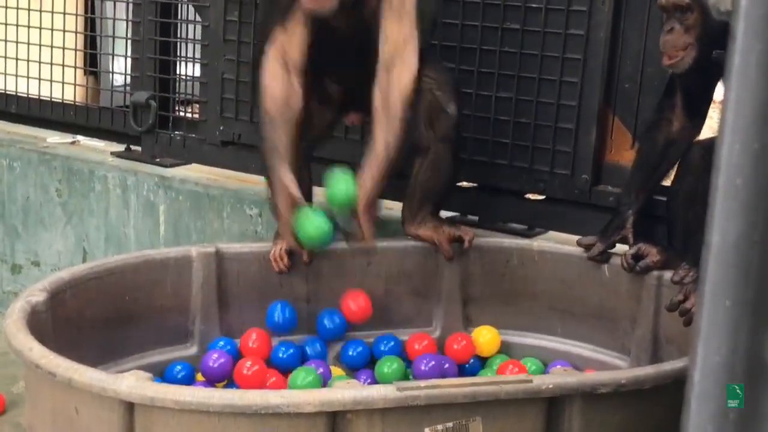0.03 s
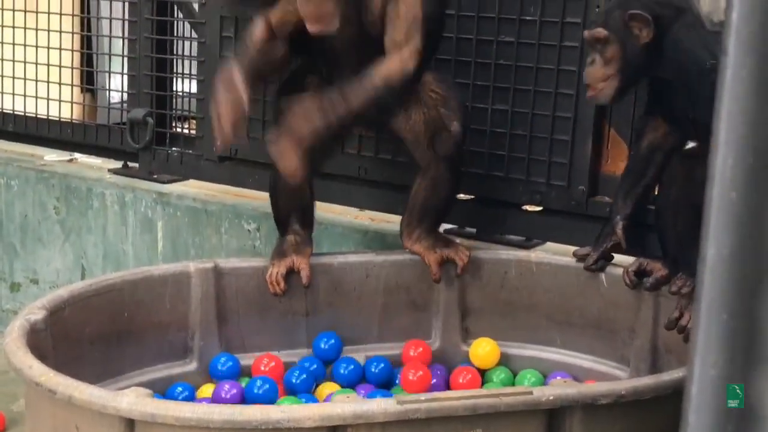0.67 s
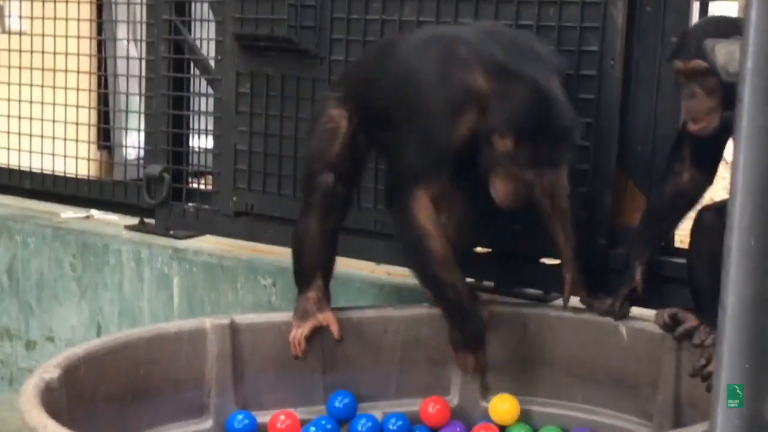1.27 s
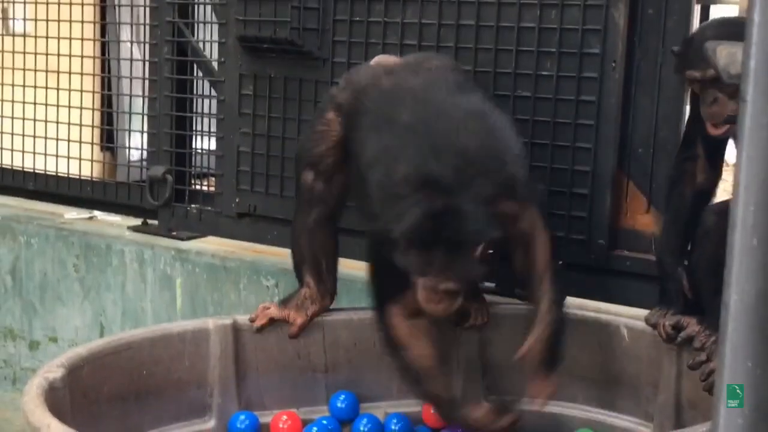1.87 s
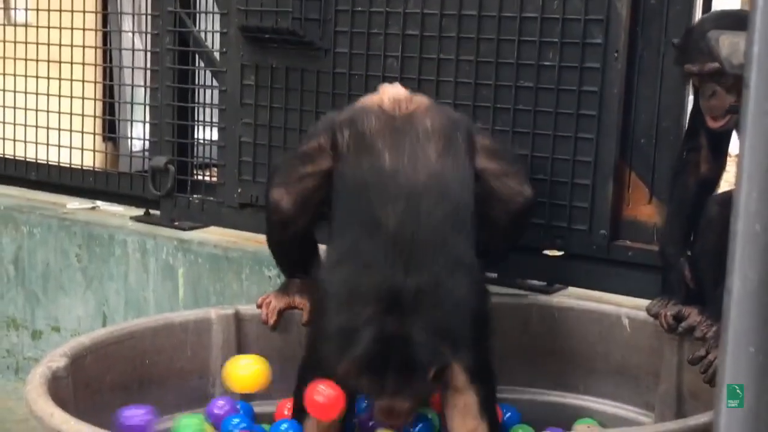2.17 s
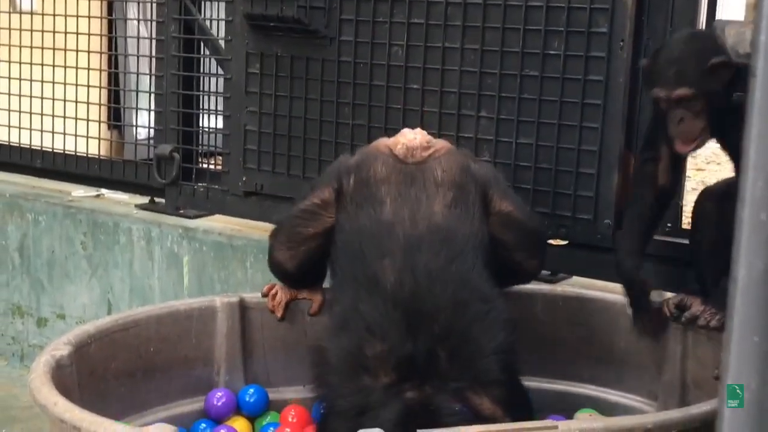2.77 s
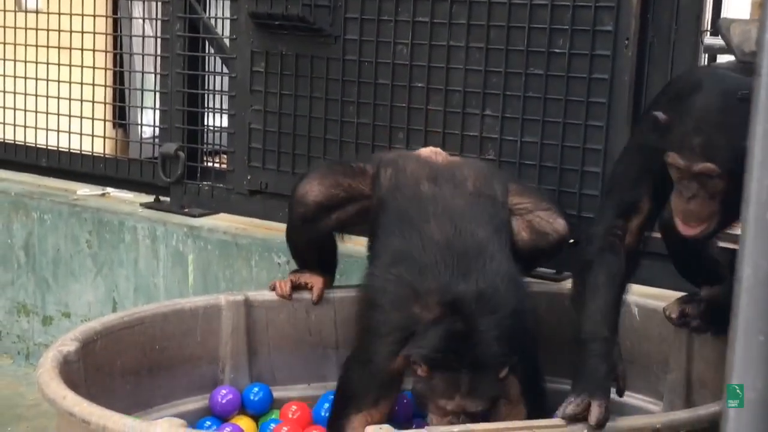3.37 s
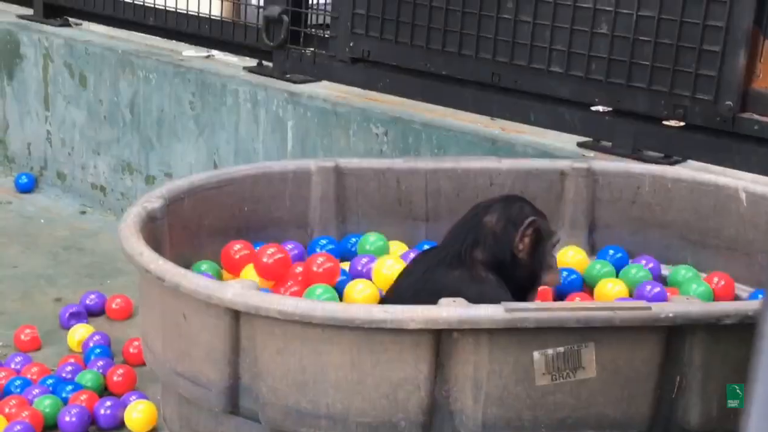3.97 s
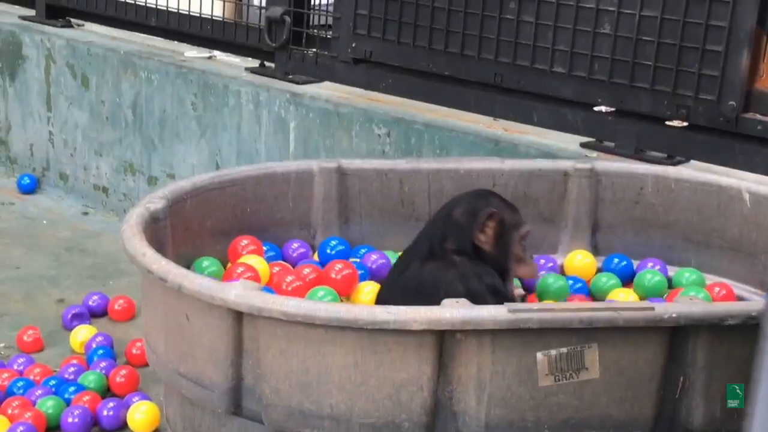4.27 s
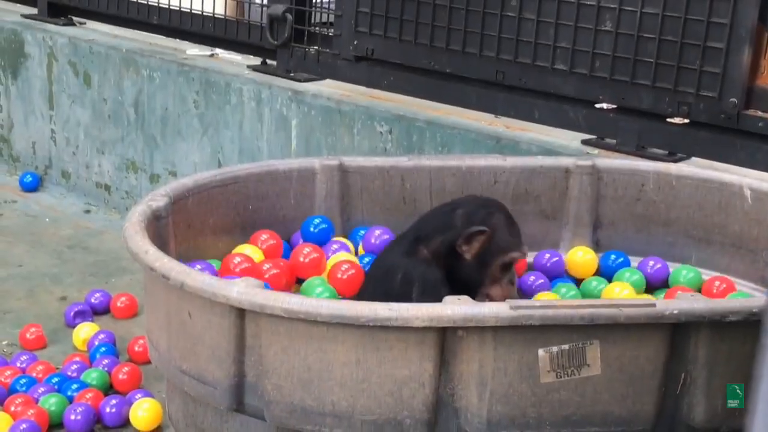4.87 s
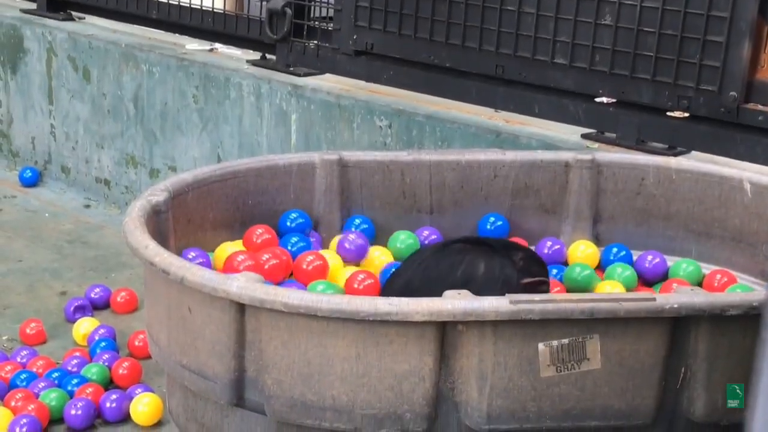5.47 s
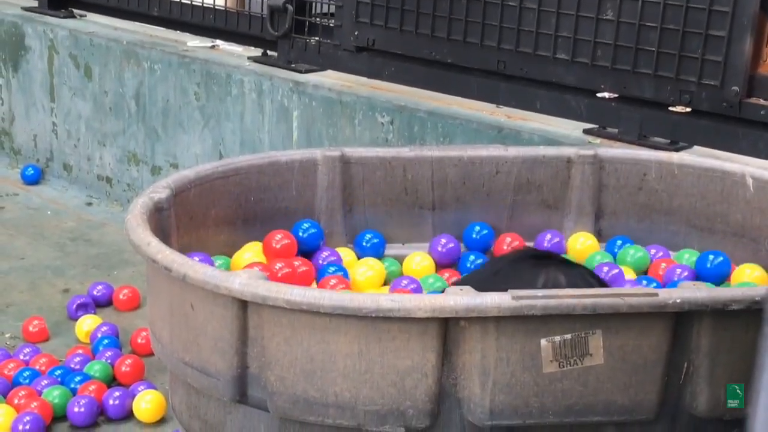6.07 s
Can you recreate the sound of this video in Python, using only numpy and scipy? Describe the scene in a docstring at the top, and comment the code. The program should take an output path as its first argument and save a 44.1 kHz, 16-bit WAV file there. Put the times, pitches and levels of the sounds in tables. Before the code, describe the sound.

In a walled outdoor enclosure with faint wind, single plastic balls tick against each other and bump a big tub. A heavy, hollow thump sets them all rolling as a chimpanzee jumps in, and the rumble fades. In the last third the ape rummages steadily, a dense hollow clatter mixed with dull thuds. The sound is centred, with the bright clicks spread wide and a brief echo.

```python
"""Chimpanzee in a ball tub.

A chimpanzee plays in a big plastic tub of hollow plastic balls in a walled outdoor enclosure.
Single balls click and knock, its limbs thump the panels, it jumps in and rummages; then an ape
burrows in a fuller tub. Rolling balls drum on the floor, the walls echo, a low wind lies beneath."""
import sys
import numpy as np
from scipy import signal
from scipy.fft import rfft, irfft, next_fast_len
from scipy.io import wavfile
from scipy.ndimage import map_coordinates

SR = 44100
rng = np.random.default_rng(int(sys.argv[2]) if len(sys.argv) > 2 else 0)


def generate_wav(signal):
    """Clip the signal to [-1, 1] and save it as 16-bit WAV at the path in sys.argv[1]."""
    frames = np.transpose(np.atleast_2d(signal))
    scaled = np.clip(frames, -1, 1) * 32767
    pcm = np.round(scaled).astype(np.int16)
    wavfile.write(sys.argv[1], SR, pcm)


N = 270774

# ball against ball: start_s, level_db, body_db, ring_hz, echo_db
BALL_CLICKS = [(.0034, -41.5, -1.5, 2730, 6), (0.1569, -52.5, -13, 2900, 5), (0.205, -52, -6, 2830, 0),
               (0.2422, -43, 0, 2420, 5), (0.263, -45.5, -10, 5700, -3), (0.2814, -41.5, -14, 3100, -0.5),
               (0.386, -45.5, -9, 3000, 0), (0.5445, -40.5, -5, 3050, 0.5), (0.6409, -45.5, -9, 2640, 4.5),
               (0.6775, -50.5, -19, 3380, 2.5), (.7498, -47.5, 5, 2320, -1.5), (0.957, -48, -7, 2730, 13),
               (0.9687, -29, -2.5, 2485, -2), (1.1432, -47, -1, 2960, 0), (1.2353, -32.5, 0, 2440, -1.5),
               (1.657, -47.5, 0, 3310, 8), (2.0097, -38, -1.5, 2495, 5), (2.06, -42, -14, 2810, 7.5),
               (2.3311, -49, 7, 2850, 9), (2.5931, -43.5, -2.5, 2580, 5), (2.766, -53.5, -4, 2830, 0),
               (3.0266, -49, -4, 3040, 0), (4.236, -54, 4, 4510, 3), (4.3467, -46, 4, 2860, 4.5),
               (5.8469, -45, -1, 2790, -2), (6.031, -50.5, -9, 4050, 9)]
# crack of a thin shell: freq_hz, gain_db
CRACK_SPECTRUM = [(700, -68), (1800, 5), (2600, 10.5), (3800, 0), (4600, 0.5), (6500, 2), (8000, -1.5),
                  (9200, 1), (10800, -5), (13000, -1), (16000, -7.5)]
# blow on the tub wall or rim: freq_hz, gain_db
KNOCK_SPECTRUM = [(150, -45), (400, -18), (650, 15), (900, -5), (1400, 3), (2400, -24), (4200, -15),
                  (16000, -36)]
# hollow knocking of a few balls: freq_hz, gain_db
FEW_BALLS_SPECTRUM = [(240, -24), (400, 3.5), (468, -3), (576, -3), (694, -1.5), (781, -14.5), (862, -7),
                      (1280, -10), (1700, -17.5), (2400, -15.5), (3730, -26.5), (4200, -39), (5460, -59),
                      (9240, -120)]
# ball damped by its neighbours: pitch_ratio, level_db, t60_s
HELD_BALL_MODES = [(1, 1.5, 0.037), (2.05, -8.5, .02)]


def thumps():
    """Soft limbs make the tub's panels boom."""
    # hands and feet: start_s, level_db, pitch_hz, ring_s
    blows = [(.012, -40, 159, 0.19), (.342, -40.5, 139, 0.32), (0.406, -34, 148, 0.2),
             (.409, -36, 320, 0.076), (0.572, -24, 239.7, 0.19), (1.510, -35.5, 149, 0.074),
             (1.546, -36.5, 136, .12), (1.615, -43, 348, .07), (2.042, -37, 282, 0.2),
             (2.092, -22, 254.6, 0.26), (2.113, -33, 155, .2), (2.969, -40, 265, 0.07),
             (3.24, -39, 134, 0.27), (3.452, -28.5, 183, 0.14), (4.097, -26, 210.5, 0.11),
             (4.207, -30.5, 168, 0.14), (4.796, -27, 149, 0.16), (4.843, -29, 175, 0.09),
             (5.083, -30.5, 238, 0.074), (5.585, -32, 185.4, 0.22), (5.644, -32, 145, 0.16),
             (5.682, -31.5, 196, .15), (5.83, -31, 142, .14)]
    # panel: pitch_ratio, level_db, t60_ratio
    panel_modes = [(0.549, -14, 1.3), (.75, -6, 0.93), (1, 1.5, 1.2), (1.27, -5.5, 0.43), (1.7, -12, 0.25),
                   (2.9, -11, 0.069)]
    # panel radiation band: freq_hz, gain_db
    radiation = [(110, 0), (1500, 0)]
    out = np.zeros(N)
    for start_s, level_db, pitch_hz, ring_s in blows:
        modes = [(pitch_hz * ratio, db, ring_s * share) for ratio, db, share in panel_modes]
        boom = with_echo(ringing(modes, attack_s=0.0006), echo_db=-15)
        add(out, start_s, amp(level_db - 5.5) * coloured(boom, radiation))
    return out


def landing():
    """The ape's weight sets every ball moving; friction slows them evenly to a stop."""
    # tub under a full landing: freq_hz, gain_db
    tub = [(24, -67), (40, -31), (67, -8.5), (130, -2), (193, 0), (226, -7), (259, 4.5), (294, -1),
           (413, -8.5), (473, -23), (600, -9.5), (780, -38), (1320, -120)]
    start_s, rise_s, stop_s, loudness_power = 2.01, 0.1, 0.93, 2.08
    t = np.arange(N) / SR - start_s
    speed = np.clip(1 - np.maximum(t - rise_s, 0) / stop_s, 0, 1)
    motion_db = shove_db(start_s, rise_s) + loudness_power * 20 * np.log10(speed + 1e-5)
    return rummage(motion_db - 32, motion_db - 40, tub, FEW_BALLS_SPECTRUM, tick_db=-15.5)


def burrowing():
    """An ape keeps a full tub in motion; single balls ring out above the rest."""
    # stirring strength: time_s, drum_db, knock_db
    effort = [(3.99, -39, -46.5), (4.022, -37.5, -46.5), (4.15, -38, -48), (4.32, -41.5, -49.5),
              (4.54, -41.5, -50), (4.62, -43.5, -48.5), (4.69, -44.5, -51.5), (4.92, -42, -50.5),
              (5.08, -46.5, -53), (5.28, -40, -51.5), (5.47, -42.5, -50), (5.6, -38, -48),
              (5.78, -39, -46.5), (5.87, -39.5, -47), (6.05, -41.5, -47.5), (6.14, -44, -51.5)]
    # full tub: freq_hz, gain_db
    tub = [(35, -39), (70, -8.5), (100, -8), (132, 3), (156, -2.5), (182, 3), (225, -1), (268, -1.5),
           (370, -4), (480, -12), (600, -19.5), (780, -38.5)]
    # hollow knocking of many balls: freq_hz, gain_db
    many_balls = [(250, -10.5), (400, -8), (480, -7.5), (630, -3), (760, -9), (880, -7.5), (1200, -11),
                  (1600, -16.5), (2850, -17), (3350, -21), (3700, -30.5), (4300, -30), (5500, -60)]
    start_s, strays_per_s, stray_hz = 3.812, 28, 720
    time_s, drum_db, knock_db = np.transpose(effort)
    t = np.arange(N) / SR
    onset_db = shove_db(start_s, rise_s=0.011)
    surge_db = 1.4 * wobble(9) - 0.6
    drumming_db = onset_db + np.interp(t, time_s, drum_db)
    knocking_db = onset_db + np.interp(t, time_s, knock_db) + surge_db
    out = rummage(drumming_db, knocking_db, tub, many_balls, tick_db=-15.5)
    for slot_s in np.arange(start_s, N / SR, 1 / strays_per_s):
        at_s = slot_s + rng.random() / strays_per_s
        pitch_hz = stray_hz * np.exp(0.36 * np.clip(rng.standard_normal(), -2, 2))
        stray = min(stray_hz / pitch_hz, 1) * ball_note(pitch_hz, HELD_BALL_MODES, echo_db=-4)
        add(out, at_s, amp(np.interp(at_s, time_s, knock_db) + 6) * stray)
    return out


def pushes():
    """A limb shoves a few loose balls, which roll to rest; overlapping energies add."""
    # shoves: start_s, rise_s, drum_db, knock_db
    shoves = [(0.0, 0.002, -45.5, -52.5), (.571, 0.016, -47, -56), (0.742, 0.034, -50, -53),
              (.86, 0.049, -60, -61.5), (1.46, 0.047, -48.5, -56.5), (1.6, 0.017, -59, -60.5),
              (2.819, 0.018, -57, -82), (2.919, 0.031, -52.5, -69.5), (3.16, 0.08, -48.5, -57),
              (3.32, 0.1, -47, -56.5)]
    # lightly stirred tub: freq_hz, gain_db
    tub = [(24, -78), (40, -28), (69, -7.5), (102, -9), (134, 1), (183, -3.5), (221, 0.5), (275, 1),
           (315, -1), (369, -3.5), (473, -20), (600, -12.5), (780, -35.5), (1320, -120)]
    energy = np.zeros((2, N))
    for start_s, rise_s, drum_db, knock_db in shoves:
        motion_db = shove_db(start_s, rise_s, fall_db_per_s=28)
        energy += amp([motion_db + drum_db, motion_db + knock_db]) ** 2
    drumming_db, knocking_db = 10 * np.log10(energy)
    return rummage(drumming_db, knocking_db, tub, FEW_BALLS_SPECTRUM, tick_db=-17.5)


def rummage(drum_db, knock_db, tub, balls, tick_db):
    """Rolling balls drum on the tub floor and knock hollowly; shell ticks follow the knocking."""
    # ticking shells: freq_hz, gain_db
    shells = [(2600, -60), (3600, 1.5), (4400, 2.5), (4800, -2), (5100, 2.5), (6800, 4), (8000, 1),
              (9400, 4.5), (10600, -2), (13000, 1), (16000, -5.5)]
    drum = stirred(drum_db, tub, rate_per_s=500, spread_db=1.5, echo_db=-6.5)
    knock = stirred(knock_db, balls, rate_per_s=170, spread_db=1.5, echo_db=7)
    tick = stirred(knock_db + tick_db, shells, rate_per_s=260, spread_db=3, echo_db=7)
    return drum + knock + tick


def clicks():
    """Thin shells meet: crack, hollow body, brief ring. Hard hits are shorter and choke the ring."""
    # body of a click: freq_hz, gain_db
    body_spectrum = [(150, -28), (400, 1), (700, 8), (1000, 5), (1500, 5), (2000, -13.5), (3500, -45.5)]
    # shell: pitch_ratio, level_db, t60_s
    shell_modes = [(1, -3, 0.049), (1.27, -10.5, 0.037), (1.95, -15.5, 0.054)]
    cavity_hz, halving_db, choke_db_per_db = 712, 37, 0.3
    mean_db = np.mean(BALL_CLICKS, axis=0)[1]
    out = np.zeros(N)
    for start_s, level_db, body_db, ring_hz, echo_db in BALL_CLICKS:
        excess_db = level_db - mean_db
        stretch = 2 ** (-excess_db / halving_db)
        crack = snap(CRACK_SPECTRUM, 0.014 * stretch, echo_db)
        body = snap(body_spectrum, 0.024 * stretch, echo_db)
        body += amp(-5) * ball_note(cavity_hz, HELD_BALL_MODES, echo_db)
        ring = amp(1.5 - choke_db_per_db * excess_db) * ball_note(ring_hz, shell_modes, echo_db - 3.5)
        add(out, start_s, amp(level_db - 4) * (crack + amp(body_db + 1) * body + ring))
    return out


def knocks():
    """A ball hits the tub wall with a hollow note; harder contacts are brighter."""
    # ball against wall: start_s, level_db, hardness_db, pitch_hz, echo_db
    hits = [(.340, -42, -9.5, 642, 0), (.5715, -39, -1.5, 1330, -2), (1.452, -51.5, 4, 666, 9.5),
            (1.458, -46, -1.5, 1350, 1.5), (1.463, -35, -13, 650, -12), (1.659, -44.5, -12, 477, -10),
            (2.089, -32, -15, 618, 3), (2.432, -31, -24, 577, -9), (3.0147, -56, -2, 1034, 0),
            (3.173, -49, -8.5, 635, 1), (3.414, -47, -14, 2160, -0.5), (4.011, -36, -19, 595, -2),
            (4.236, -36, -5, 800, -2), (4.249, -30.5, -21, 480, -2), (4.260, -40, -14, 1270, -1),
            (4.45, -44, -6, 1820, 4), (4.474, -35, -15, 672, -4), (4.787, -31.5, -22, 534, -1),
            (4.818, -31.5, -27, 585, -2), (4.826, -27, -25, 409, -3.5), (5.195, -37, -18, 406, 1),
            (5.301, -34.5, -23, 410, -3), (5.388, -39, -15, 596, -7), (5.489, -46, -16, 860, -10),
            (5.734, -32, -23, 405, -2), (5.876, -34.5, -10.5, 862, -3), (5.986, -38, -14, 986, -14),
            (6.027, -34.5, -15, 910, -2)]
    # hollow ball: pitch_ratio, level_db, t60_s
    hollow_modes = [(.72, -8, .025), (1, 0, 0.05), (1.48, -14.5, 0.02), (2.05, -18, .04)]
    # hard contact: freq_hz, gain_db
    edge_spectrum = [(600, 2), (1300, -6), (2200, -1), (3100, -6), (4200, -12), (9000, -20.5), (16000, -38)]
    out = np.zeros(N)
    for start_s, level_db, hardness_db, pitch_hz, echo_db in hits:
        hollow = ball_note(pitch_hz, hollow_modes, echo_db)
        dull = amp(hardness_db / 2 - 2.5) * snap(KNOCK_SPECTRUM, 0.17, echo_db)
        edge = amp(hardness_db) * snap(edge_spectrum, 0.025, echo_db)
        add(out, start_s, amp(level_db) * (hollow + dull + edge))
    return out


def rim_clank():
    """A hard bump rings the tub's stiff rim."""
    # bump: start_s, level_db
    bumps = [(3.689, -36.5)]
    # rim: freq_hz, level_db, t60_s
    rim_modes = [(760, -24, 0.11), (788, 1, 0.053), (1080, -13, 0.091), (1155, -4, 0.077), (1120, 9, 0.028),
                 (1406, -11.5, 0.18), (2300, -28.5, .02)]
    out = np.zeros(N)
    for start_s, level_db in bumps:
        ring = with_echo(ringing(rim_modes, attack_s=0.00061), echo_db=-3.5)
        contact = amp(-1.5) * snap(KNOCK_SPECTRUM, t60_s=0.02, echo_db=-9)
        add(out, start_s, amp(level_db - 7) * (ring + contact))
    return out


def rattles():
    """Each click passes to two neighbouring balls, which tick faintly in turn."""
    mean_gap_s = 0.07
    out = np.zeros(N)
    for start_s, level_db, *_ in BALL_CLICKS:
        delays_s = mean_gap_s * np.cumsum(0.5 + rng.random(2))
        for order, delay_s in enumerate(delays_s, 1):
            tick = snap(CRACK_SPECTRUM, t60_s=0.01, echo_db=0)
            add(out, start_s + delay_s, amp(level_db - 23.5) / order * tick)
    return out


def scrape():
    """A limb slides along the tub wall: fine slips swell and die away."""
    # sliding limb: freq_hz, gain_db
    rubbing = [(900, -4), (2500, -2), (4000, -14), (15000, -20.5)]
    level_db = shove_db(start_s=3.29, rise_s=0.071, fall_db_per_s=74) - 57.5
    slips = contacts(level_db, rate_per_s=930, spread_db=6)
    return amp(level_db) * unit_rms(coloured(with_echo(slips, echo_db=11.5), rubbing))


def squeals():
    """Two high partials of unsteady pitch: a thin squeal, or with more jitter a rough squeak."""
    # squeals: start_s, length_s, level_db, pitch_hz, jitter_hz
    events = [(0.0, 0.83, -78.5, 5647, 45), (2.597, .042, -57, 2550, 110), (5.981, 0.12, -65, 5647, 525)]
    # partials: pitch_ratio, level_db
    partials = [(1, 2), (1.1, -10)]
    out = np.zeros(N)
    for start_s, length_s, level_db, pitch_hz, jitter_hz in events:
        tone = np.zeros(N)
        for ratio, partial_db in partials:
            freq_hz = pitch_hz * ratio + jitter_hz * wobble(400)
            tone += amp(partial_db) * np.sin(2 * np.pi * np.cumsum(freq_hz) / SR)
        n = int(length_s * SR)
        add(out, start_s, amp(level_db) * unit_rms(tone)[:n] * signal.windows.tukey(n, 0.5))
    return out


def wind():
    """Outdoor air: the lows swell slightly, the far hiss is steady."""
    # air: freq_hz, gain_db
    spectrum = [(25, -20), (55, -7.5), (140, 1), (300, -1), (450, -14.5), (640, -22), (1000, -13.5),
                (1600, -20), (2600, -15.5), (3800, -30.5), (9500, -34.5), (16000, -44)]
    swell_db = wobble(1.3) + 2.5 * wobble(6)
    air = unit_rms(coloured(rng.standard_normal(N), spectrum))
    low = filtered(air, lambda hz: 1 / (1 + (hz / 300) ** 2))
    return amp(-57.5) * (air + (amp(swell_db) - 1) * low)


def echo():
    """A fresh diffuse response of tub and enclosure, 2 ms late, energy 1."""
    # wall decay: freq_hz, t60_s
    decay = [(100, 0.61), (500, 0.5), (2500, 0.51), (6000, 0.4), (15000, 0.34)]
    hz, t, noise = signal.stft(rng.standard_normal(SR // 2), SR, nperseg=256)
    tail = signal.istft(noise * amp(-60 * t / log_interp(decay, hz)[:, None]), SR, nperseg=256)[1]
    tail = np.pad(tail, (SR // 500, 0))[:SR // 2]
    return tail / np.linalg.norm(tail)


def with_echo(x, echo_db):
    return x + amp(echo_db) * signal.fftconvolve(x, echo())[:len(x)]


def treble_scatter(x):
    """Side signal: treble reaches left and right with unrelated phases."""
    # stereo width: freq_hz, side_db
    width = [(500, -71), (3000, -96), (4000, -20.5), (7000, -11.5), (14000, -4)]
    hz, _, frames = signal.stft(x, SR, nperseg=128)
    frames = frames * np.exp(2j * np.pi * rng.random(frames.shape))
    return signal.istft(frames * amp(log_interp(width, hz))[:, None], SR, nperseg=128)[1][:N]


def stirred(level_db, spectrum, rate_per_s, spread_db, echo_db):
    """Collisions ring one body and the walls; the balls move, so each stretch has its own echo."""
    blows, echoed = contacts(level_db, rate_per_s, spread_db), np.zeros(N)
    for part in np.array_split(np.arange(N), 20):
        add(echoed, part[0] / SR, with_echo(np.pad(blows[part], (0, SR // 3)), echo_db))
    return amp(level_db) * unit_rms(coloured(echoed, spectrum))


def contacts(level_db, rate_per_s, spread_db):
    """Random impulses of uneven force, rms 1, denser at higher levels."""
    hits_per_s = rate_per_s * amp((level_db - level_db.max()) / 2) + rate_per_s / 10
    hit = rng.random(N) < hits_per_s / SR
    force = rng.choice([-1, 1], N) * amp(spread_db * np.clip(rng.standard_normal(N), -2, 2))
    return unit_rms(hit * force / np.sqrt(hits_per_s))


def shove_db(start_s, rise_s, fall_db_per_s=0):
    """Level of a motion: speed rises evenly, then holds or decays."""
    t = np.arange(N) / SR - start_s
    return 20 * np.log10(np.clip(t / rise_s, 1e-5, 1)) - fall_db_per_s * np.maximum(t - rise_s, 0)


def snap(spectrum, t60_s, echo_db):
    """A shell buckles briefly: a noise burst with the energy of 2 ms at rms 1, plus its echo."""
    t = np.arange(SR // 2) / SR
    burst = rng.standard_normal(len(t)) * amp(-60 * t / t60_s)
    x = coloured(burst / np.linalg.norm(burst) + amp(echo_db) * echo(), spectrum)
    return x / np.linalg.norm(x) * np.sqrt((1 + amp(echo_db) ** 2) * (SR // 500))


def ball_note(pitch_hz, modes, echo_db):
    """A hollow shell rings briefly; its echo is a broader blur around the pitch."""
    ring = ringing([(pitch_hz * ratio, db, t60_s) for ratio, db, t60_s in modes], attack_s=0.00057)
    resonance = [(pitch_hz * 2 ** -0.5, -11), (pitch_hz, 0), (pitch_hz * 2 ** 0.5, -11)]
    blur = coloured(echo(), resonance)
    return ring + amp(echo_db) * blur * np.linalg.norm(ring) / np.linalg.norm(blur)


def ringing(modes, attack_s):
    """Damped modes, their strengths varying slightly from blow to blow."""
    t = np.arange(SR // 2) / SR
    ring = sum(amp(db + rng.normal(0, 1) - 60 * t / t60_s) * np.sin(2 * np.pi * hz * t)
               for hz, db, t60_s in modes)
    return ring * (1 - np.exp(-t / attack_s))


def coloured(x, spectrum, size=8192):
    """Minimum-phase body filter, falling 20 dB per octave beyond the spectrum's ends."""
    hz = np.fft.rfftfreq(size, 1 / SR) + 1
    beyond_oct = np.abs(np.log2(hz / np.clip(hz, spectrum[0][0], spectrum[-1][0])))
    cepstrum = irfft(np.log(amp(log_interp(spectrum, hz) - 20 * beyond_oct) + 1e-6))
    cepstrum[1:size // 2] *= 2
    cepstrum[size // 2 + 1:] = 0
    return signal.fftconvolve(x, irfft(np.exp(rfft(cepstrum))))[:len(x)]


def filtered(x, response):
    size = next_fast_len(len(x) + SR // 4)
    return irfft(rfft(x, size) * response(np.fft.rfftfreq(size, 1 / SR)), size)[:len(x)]


def wobble(knots_per_s):
    """Smooth random curve."""
    knots = rng.standard_normal(int(N * knots_per_s / SR) + 4)
    return map_coordinates(knots, [np.arange(N) * knots_per_s / SR])


def log_interp(points, hz):
    point_hz, values = np.transpose(points)
    return np.interp(np.log(hz + 1), np.log(point_hz + 1), values)


def add(track, start_s, sound):
    part = track[max(round(start_s * SR), 0):][:len(sound)]
    part += sound[:len(part)]


def amp(db):
    return 10 ** (np.asarray(db) / 20)


def unit_rms(x):
    return x / np.sqrt(np.mean(x ** 2) + 1e-20)


def scene():
    """All sources centred, the treble spread wide."""
    balls = pushes() + landing() + burrowing() + clicks() + rattles() + knocks()
    mid = balls + thumps() + rim_clank() + scrape() + squeals() + wind()
    side = treble_scatter(mid)
    return np.array([mid + side, mid - side])


def record(dry):
    """Brick-wall low-pass."""
    cutoff_hz = 15850
    return np.array([filtered(x, lambda hz: hz < cutoff_hz) for x in dry])


dry = scene()
out = record(dry)
generate_wav(out)
```